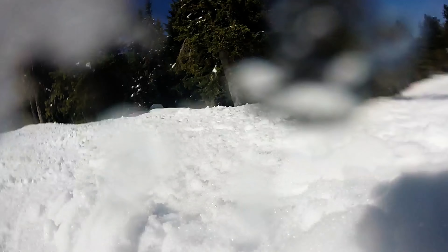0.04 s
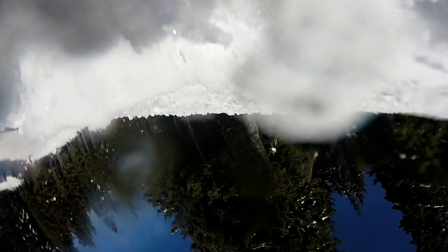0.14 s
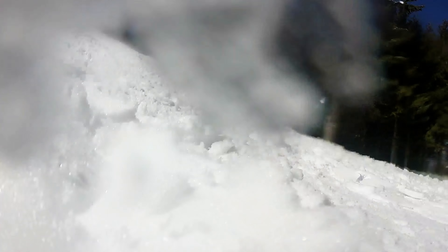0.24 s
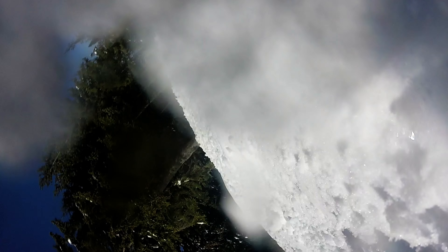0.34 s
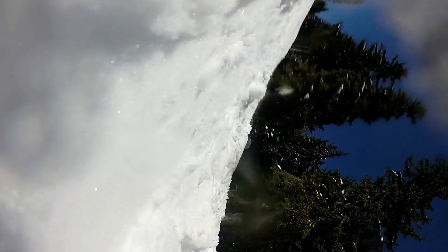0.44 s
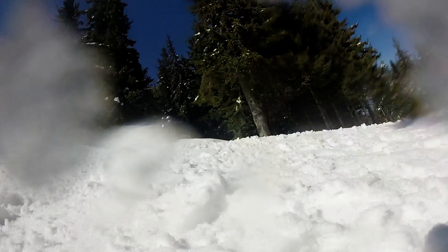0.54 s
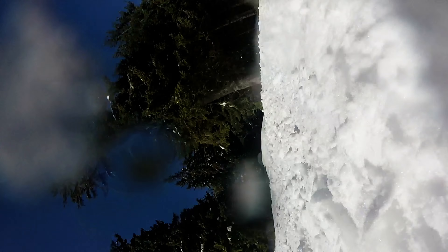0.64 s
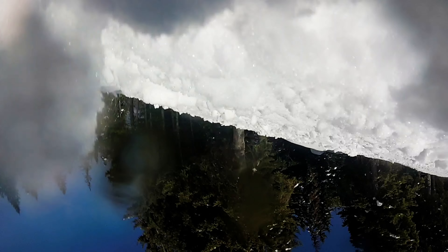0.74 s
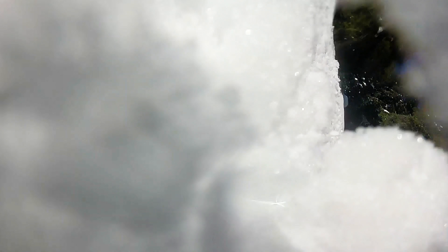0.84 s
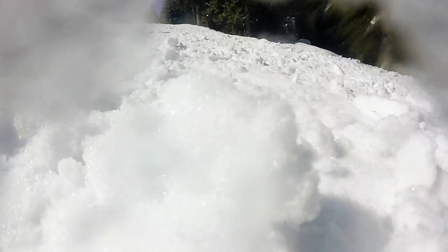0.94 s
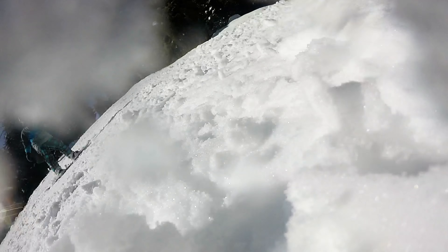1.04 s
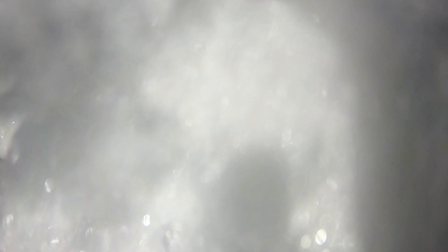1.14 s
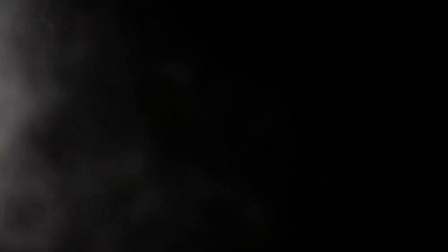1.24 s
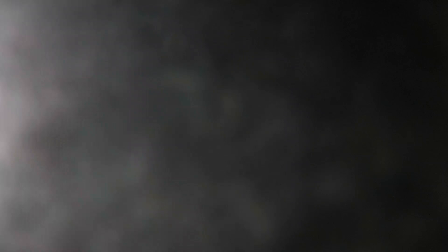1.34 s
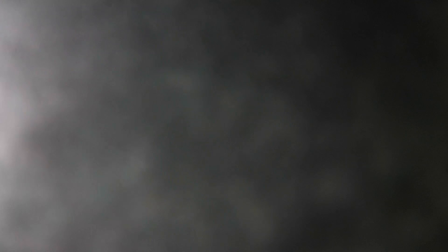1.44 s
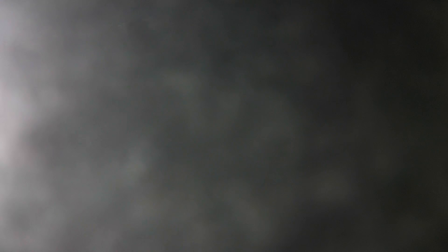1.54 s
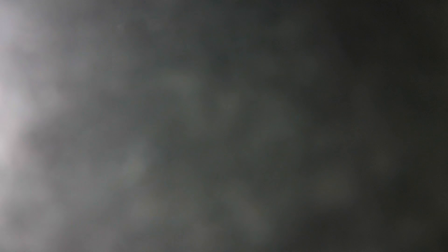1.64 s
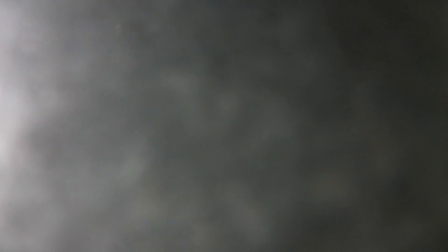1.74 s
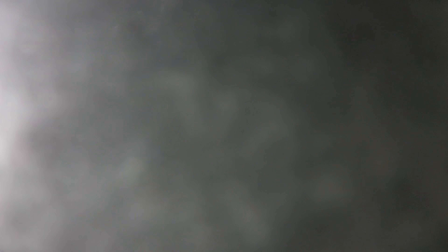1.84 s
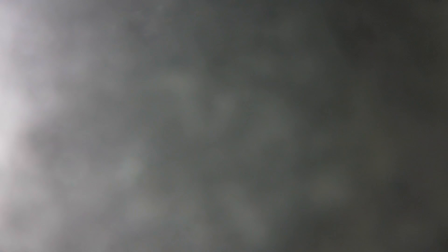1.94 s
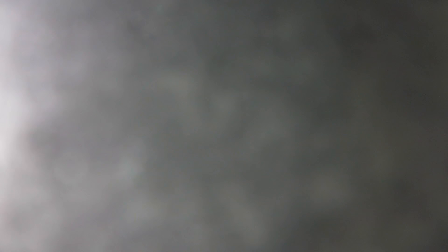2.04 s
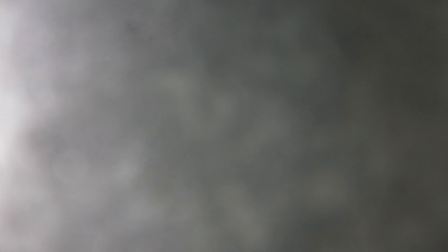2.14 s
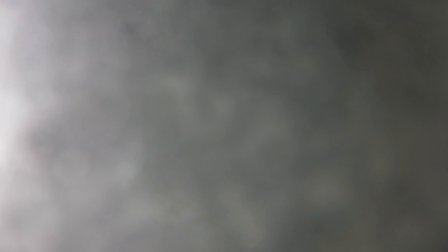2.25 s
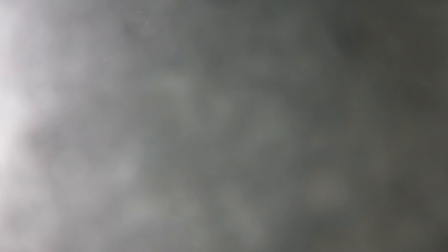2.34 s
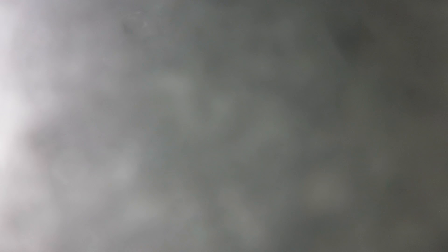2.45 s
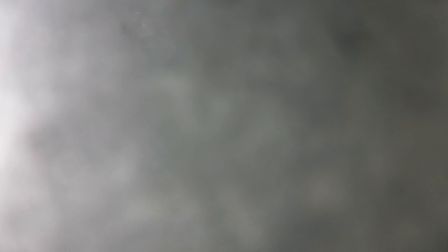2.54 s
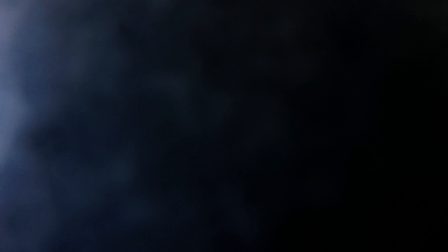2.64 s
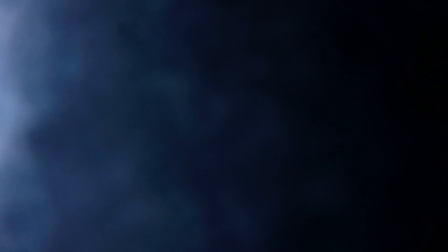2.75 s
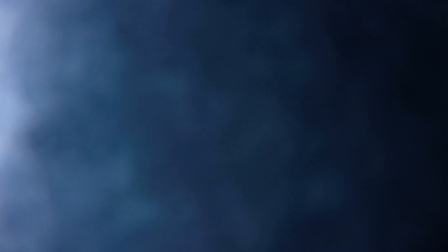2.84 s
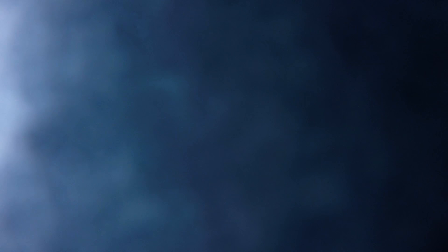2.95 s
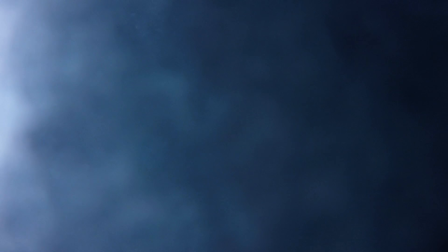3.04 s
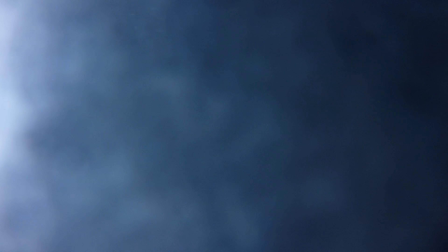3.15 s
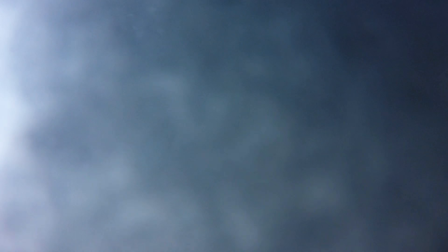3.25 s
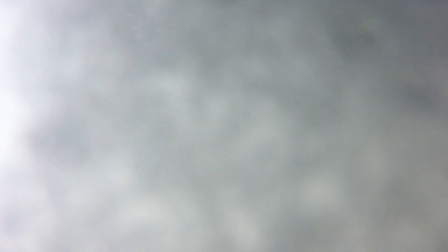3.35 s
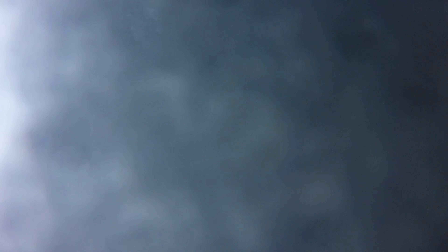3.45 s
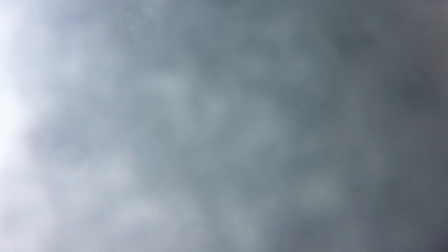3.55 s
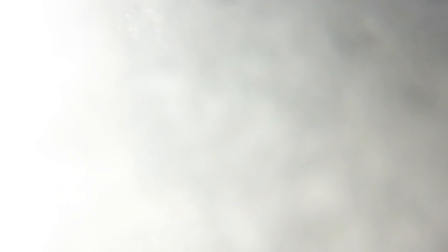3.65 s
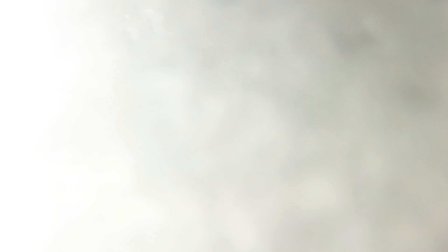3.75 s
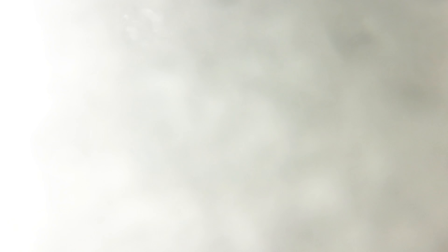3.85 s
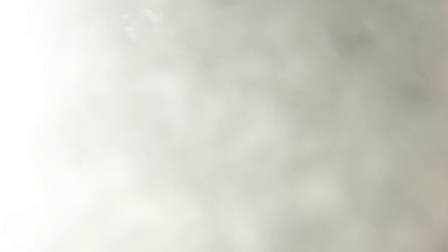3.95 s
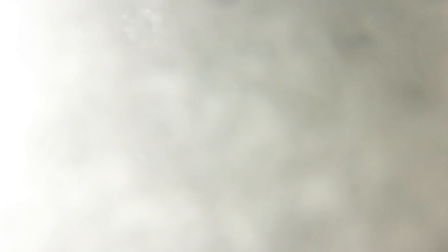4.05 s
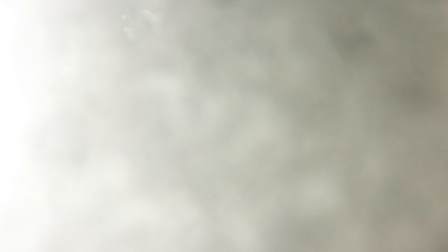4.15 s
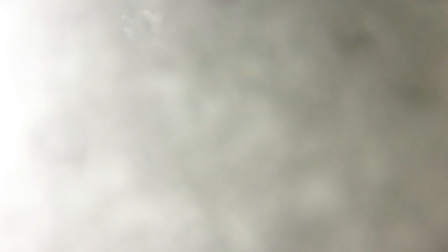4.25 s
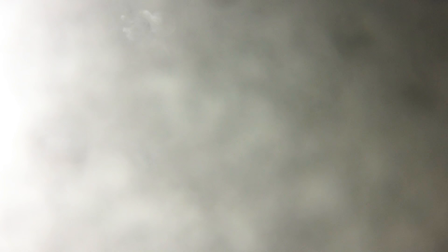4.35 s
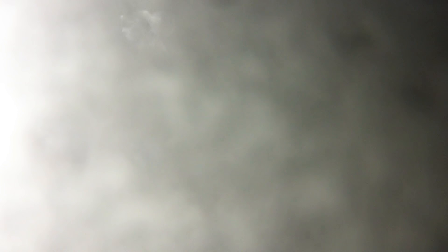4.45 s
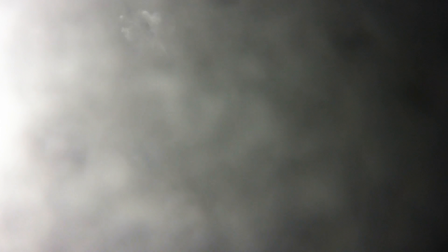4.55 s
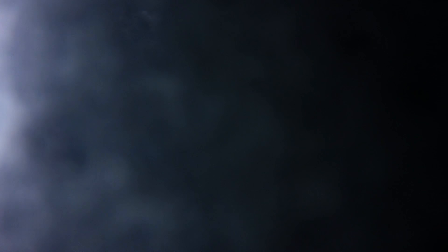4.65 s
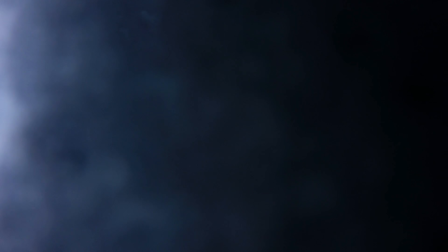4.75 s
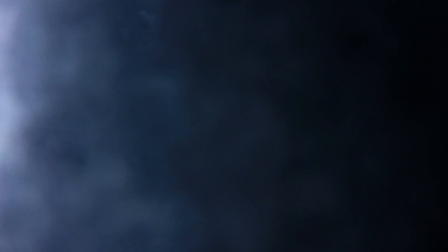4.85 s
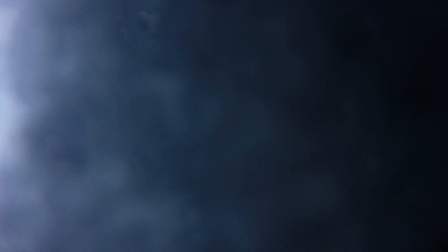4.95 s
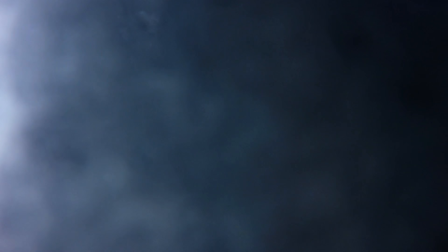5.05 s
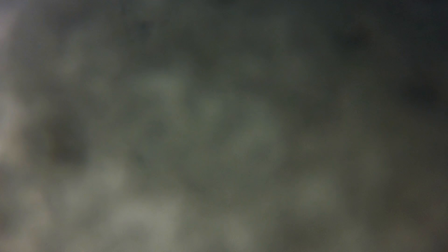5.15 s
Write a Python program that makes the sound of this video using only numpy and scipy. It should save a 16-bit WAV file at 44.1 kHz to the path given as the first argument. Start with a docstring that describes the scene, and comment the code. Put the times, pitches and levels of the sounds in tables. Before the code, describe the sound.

Snow crunches and cracks right against the microphone as a small camera bounces rapidly down a slope, its case knocking on hard crust with puffs of low rumble. The clatter ends abruptly. After a short lull, much quieter muffled scraping swells and fades twice as the camera slides in packed snow, ending in a cluster of damped bumps. Everything is very close and dry, outdoors, over a faint hiss.

```python
"""A camera tumbling in snow

A small camera tumbles down a slope. Each touch fractures snow grains, which excite the resonances of
its case and microphone port; landings force air into the port, and the hardest blows overload the
microphone. It ends face down, the port packed with snow, where the friction noise of soft scraping
swells twice and the case settles with a few damped knocks."""
import sys
import numpy as np
from scipy import signal
from scipy.fft import rfft, irfft, next_fast_len
from scipy.io import wavfile
from scipy.ndimage import map_coordinates

SR = 44100
rng = np.random.default_rng(int(sys.argv[2]) if len(sys.argv) > 2 else 0)


def to_wav(sig):
    """Store sig (one row per channel, or 1-D mono) as 16-bit WAV at the path in sys.argv[1].

    Samples outside -1..1 are clipped; the rate is SR.
    """
    pcm = np.clip(np.atleast_2d(sig), -1, 1) * 32767
    pcm = np.round(pcm).astype(np.int16)
    wavfile.write(sys.argv[1], SR, pcm.T)  # frames by channels


N = 229320

# Contacts with the snow; the powder level is high in loose snow, low in packed:
# (time [s], hold [s], level [dB], swell over the hold [dB], relative powder level [dB])
TOUCHES = [(0.0439, 0.003, -8.5, 3.5, -15.5), (.096, 0.014, -47, 3, 1), (.112, 0.0074, -16.5, 3, -23),
           (.146, 0.0076, -16.5, -3.5, -33.5), (0.2057, 0.019, -22, 2, -12.5),
           (0.2439, 0.0062, -20.5, -2, 0), (0.255, 0.022, -27, -12, -16), (.284, 0.019, -40.5, 11, -2.5),
           (.309, .033, -20.5, 0, -14), (.356, 0.029, -22, -3, -26.5), (0.409, 0.0034, -38.5, 2, -30),
           (.429, 0.036, -17.5, 1.5, -13), (.471, 0.01, -18, -7, -6), (.484, 0.021, -28, -8.5, -13),
           (0.512, .014, -32.5, 4, -22.5), (0.547, 0.041, -36, 12.5, -4), (0.579, 0.014, -17.5, 2, -17.5),
           (0.5945, 0.0037, -3, -2.5, -24), (.621, 0.023, -26.5, -3, -26), (.718, 0.013, -37, 16, -10),
           (0.73, 0.017, -17.5, -3, -9), (.758, 0.061, -23, -5.5, -16), (.797, 0.015, -15, -5.5, -26),
           (.813, 0.01, -17, 10, -10.5), (0.839, 0.019, -25, 0, -8), (0.866, 0.065, -29.5, 7.5, -13),
           (0.939, 0.049, -22.5, 9.5, -17), (.996, 0.13, -34, -11, -29.5),
           (1.104, 0.045, -20.5, 2.5, -24.5), (1.149, 0.017, -13, 1, -33), (1.17, 0.016, -22, -3, -24),
           (1.191, 0.022, -19, -1.5, -14), (1.212, 0.013, -15, -0.5, -16.5), (1.231, .034, -17.5, 3, -17.5),
           (1.27, 0.076, -25.5, -6.5, -17.5)]
# Impacts of the bare case on hard crust: (time [s], crack peak [dB], knock peak [dB])
BLOWS = [(0.0463, 3, -7.5), (0.115, -22, -20), (0.1467, -22, -27), (0.1512, -27, -27), (0.4796, -26, -7),
         (0.595, -5, -4), (0.6217, -15, -39), (0.776, -30, -45), (0.7989, -5.5, -23), (0.914, -14.5, -47),
         (0.9432, -10.5, -51), (1.0741, -20, -40), (1.1925, -16, -23), (1.226, -12.5, -11.5),
         (1.316, -12.5, -17)]
# Pressure pulses entering the port: (time [s], level before leakage [dB], Gaussian half width [s])
AIR_PULSES = [(0.0474, 5.5, 0.00035), (0.12, -7, 0.0016), (0.249, -13.5, 0.00085), (0.336, -20, .0015),
              (0.357, -20, 0.0012), (0.4791, -10, 0.001), (.597, -13, 0.0035), (0.749, -17.5, 0.0043),
              (0.8272, -13.5, .0015), (0.921, -20, 0.0024), (1.218, -15.5, .0014), (1.231, -20, 0.0038),
              (1.357, -20, 0.0039)]
# Settling impacts: (time [s], level [dB], hardness as spectral tilt [dB/decade], thud frequency [Hz])
KNOCKS = [(3.5622, -27.5, 3, 342), (3.569, -31, 6, 444), (3.683, -25, -1.5, 386), (3.689, -33, -6, 302),
          (4.4931, -15, -10.5, 265), (4.497, -21, -3.5, 312), (4.542, -23, -3, 258),
          (4.585, -22.5, -8, 275), (4.615, -32.5, 0, 320), (4.637, -31, -12, 317), (4.659, -34, 4, 337)]
# Fractures of single ice crystals: (time [s], peak [dB], relative sparkle level [dB])
TICKS = [(1.7788, -46, -22), (3.2864, -47, -16), (3.5173, -34, -31), (3.615, -45, -9), (4.2464, -34.5, -12),
         (4.4674, -44.5, -10), (4.573, -45, -12), (4.5944, -45, -14), (4.8346, -42.5, -11.5),
         (4.8521, -43, -13), (5.1542, -48, -1)]

# Resonances: (frequency [Hz], bandwidth [Hz], relative gain [dB])
SHELL_RESONANCES = [(1600, 310, 1.5), (1970, 220, -5), (2376, 500, -1), (2734, 78, 0.5)]  # ring of the bare case
HOUSING_RESONANCES = [(716, 22, 3), (474, 14, -8), (2250, 7.4, -18.5)]  # its faint after-ring
# Modes of free vibration: (frequency [Hz], relative level [dB], T60 [s])
BARE_MODES = [(328, -9.5, 0.023), (490, -8.5, 0.0035), (620, -1, 0.02), (776, 3, 0.0065), (950, 4, 0.012),
              (661, -26, 0.075)]  # knock of the bare case
PACKED_MODES = [(554, -18, 0.013), (773, -21, 0.0069), (1606, -13.5, 0.019), (2446, -3.5, 0.012),
                (2700, -9.5, .014)]  # upper modes of the case packed in snow

# Friction on the buried case: (time [s], hollow rub level [dB], hiss level [dB])
SCRAPES = [
    [(1.45, -80.5, -84), (1.626, -80.5, -87), (2.004, -59, -64), (2.37, -42.5, -58.5), (2.452, -40, -51),
     (2.652, -41, -48.5), (2.724, -46.5, -52.5), (2.862, -45.5, -50), (2.896, -47.5, -54),
     (2.918, -52.5, -53.5), (3.24, -62.5, -67.5), (3.44, -64.5, -66)],
    [(3.46, -65, -64), (3.576, -53.5, -58), (3.676, -55, -57), (3.684, -48, -58), (3.724, -52.5, -61),
     (3.946, -44, -56), (4.178, -46.5, -58.5), (4.312, -44.5, -45), (4.352, -41, -42), (4.378, -42, -48),
     (4.392, -60, -68), (4.42, -58.5, -63.5)],
]  # one table for each of two long scrapes
SETTLING = [(4.61, -59, -66.5), (4.672, -54, -64), (4.684, -68, -77), (5.15, -77, -81)]  # the last of the rubbing
# Envelope of the low rasp: (time [s], level [dB])
RASP_LEVEL = [(1.45, -82.5), (1.92, -66), (1.98, -54), (2.36, -54.5), (2.46, -44.5), (2.75, -57.5),
              (3.52, -68.5), (3.53, -63.5), (4.37, -57), (4.41, -73), (4.51, -63), (5.05, -80.5)]
# Spectral peak of the hiss, which dips as each scrape swells, then partly climbs back:
# (time [s], frequency [Hz])
SWISH_CENTRE = [(1.5, 4500), (2.2, 5180), (2.45, 3894), (2.65, 4127), (2.85, 4535), (3.2, 4420),
                (3.55, 5326), (3.8, 3390), (4.05, 3280), (4.22, 4580), (4.38, 4620)]

# Noise spectra: (frequency [Hz], relative spectral density [dB])
CRUSH_SPECTRUM = [(30, -28.5), (150, -16.5), (400, -5), (800, -6), (1150, -2), (1500, -3.5), (2600, -2.5),
                  (3100, -9), (3800, -34.5), (6000, -74)]  # snow crushed against the case
GRIT_SPECTRUM = [(2000, -44.5), (3000, 2.5), (3650, 2), (4150, 2), (4700, 2.5), (5400, -1), (5900, 1.5),
                 (6600, -3), (7300, -20.5), (8500, -47.5)]  # coarse grains
POWDER_SPECTRUM = [(5500, -50.5), (7300, 4), (8300, -3.5), (9900, -1.5), (10800, -8), (12500, -6),
                   (15000, -13), (16000, -20)]  # fine powder
RUB_SPECTRUM = [(1500, -43.5), (1900, -12), (2150, -4), (2400, 0), (2620, 2), (2830, -4.5), (3080, -12.5),
                (3700, -50.5)]  # hollow resonance under packed snow
RASP_SPECTRUM = [(500, -24), (850, -8.5), (1300, -6), (1600, 2), (1750, -2.5), (1950, -5.5), (2400, -37)]  # low rasp of a scrape
BODY_SPECTRUM = [(50, -19.5), (130, -5), (220, -4), (320, 1.5), (450, -2), (650, -5.5), (850, -11.5),
                 (1300, -36)]  # bass beneath the rasp
HISS_SPECTRUM = [(2600, -44.5), (3200, 0.5), (3600, -0.5), (4400, -2.5), (5200, -3.5), (5700, -4),
                 (6400, -5), (7200, -22), (9000, -64)]  # grains rubbing past
FINE_SPECTRUM = [(5000, -46), (6300, 5.5), (7000, 0), (7600, -4), (8200, -9), (10000, -16.5), (13000, -32),
                 (16000, -53)]  # finest, highest hiss
SCUFF_SPECTRUM = [(60, -4), (140, -2), (450, 0), (800, -5), (1100, -25), (2500, -6), (5000, -36)]  # short scuff on packed snow
TICK_SPECTRUM = [(2400, -36.5), (3400, 3.5), (4300, 5), (5500, 1.5), (7000, -15), (9000, -23)]  # a snapping crystal
RUMBLE_SPECTRUM = [(15, -7.5), (35, -0.5), (90, -2.5), (180, -4.5), (300, -12), (700, -34), (2000, -72.5)]  # air and loose snow on the case
FLOOR_SPECTRUM = [(100, -0.5), (3000, 0), (7000, -1.5), (10000, -4), (11500, -6.5), (13500, -11),
                  (15500, -22.5)]  # even background hiss


def crunches(port_hz=2170, port_hz_per_db=21.5, port_width_hz=750, shell_db=5, lead_s=0.03):
    """Brittle fracture: each touch breaks a burst of grains, which excite the shell and the port."""
    out = np.zeros(N)
    t = np.arange(SR // 5) / SR - lead_s
    shell = lambda hz: 1 + amp(shell_db) * modal_response(hz, SHELL_RESONANCES)
    for s, hold, db, swell_db, powder_db in TOUCHES:
        loose_db = powder_db + 16  # looser snow rings the port higher and is grittier
        port = lambda hz: 0.38 + resonance(hz, port_hz + port_hz_per_db * loose_db, port_width_hz)
        snaps = grains(len(t), rate=2000, spread_db=2.0, bed=0.54)
        crush = coloured(filtered(snaps, lambda hz: shell(hz) * port(hz)), CRUSH_SPECTRUM)
        # each snap spreads through the crust
        scatter = rng.standard_normal(len(t)) * amp(-60 * (t - t[0]) / 0.0045)
        spray = unit(signal.fftconvolve(snaps, scatter)[:len(t)]) + 0.39 * rng.standard_normal(len(t))
        lumps = amp(1.4 * wobble(110)[:len(t)])  # packed lumps break one by one
        grit = amp(-5 + 0.51 * loose_db) * coloured(spray, GRIT_SPECTRUM)
        powder = amp(powder_db) * coloured(spray, POWDER_SPECTRUM)
        add(out, s + t[0], touch_envelope(t, hold, db, swell_db) * (lumps * crush + grit + powder))
    return out * amp(1.08 * wobble(300))  # the snow gives way in small slips


def touch_envelope(t, hold, db, swell_db, attack_s=0.0019, lead_t60=0.03, trickle_t60=0.1):
    """Contact pressure rises as snow yields and decays at lift-off; loose grains lead and trail it."""
    early, late = np.maximum(-t, 0), np.maximum(t - hold, 0)
    pressure = amp(db + swell_db * (np.clip(t / hold, 0, 1) - .5))
    release_t60 = 0.039 / (1 + amp(db + 11.5) ** 2)  # above -11.5 dB the case bounces straight off
    contact = amp(-20 * early / attack_s - 60 * late / release_t60)
    trickle = amp(-29 - 60 * early / lead_t60 - 60 * late / trickle_t60)
    return np.hypot(pressure * contact, pressure ** 0.6 * trickle)


def blows(crack_t60=0.0057, shell_db=8):
    """Impulsive excitation: a hard contact cracks the crust and sets the whole case vibrating."""
    out, t = np.zeros(N), np.arange(SR // 10) / SR
    shell = lambda hz: resonance(hz, 3500, 5000) + amp(shell_db) * modal_response(hz, SHELL_RESONANCES)
    for s, crack_db, knock_db in BLOWS:
        burst = rng.standard_normal(len(t)) * amp(-60 * t / crack_t60)
        crack = filtered(burst, lambda hz: shell(hz) / (1 + (hz / 7500) ** 6))
        knock = sum(damped_mode(t, hz, db + rng.normal(0, 2.4), t60) for hz, db, t60 in BARE_MODES)
        add(out, s, amp(crack_db) * crack / np.abs(crack).max())
        add(out, s, amp(knock_db) * knock / np.abs(knock).max())
    return out


def air_thumps(vent_hz=36):
    """Compression of air at the port: the pressure leaks away and swings back, a high-pass response."""
    out, t = np.zeros(N), np.arange(N) / SR
    for s, db, width in AIR_PULSES:
        out += amp(db) * np.exp(-.5 * np.minimum(((t - s) / width) ** 2, 100))
    return filtered(out, lambda hz: (1j * hz) ** 2 / (vent_hz ** 2 - hz ** 2 + 1.8j * hz * vent_hz))


def buffeting(full_pressure_db=-27.5, rest_db=-63.5):
    """Buffeting by air and loose snow makes a rumble that grows as a power of the contact pressure."""
    pressure, t = np.zeros(N), np.arange(SR // 5) / SR
    for s, hold, db, swell_db, _ in TOUCHES:
        add(pressure, s, touch_envelope(t, hold, db, swell_db))
    level = amp(full_pressure_db) * pressure ** 0.58 + amp(rest_db) * background_fade_in()
    return level * amp(3 * wobble(30)) * coloured(rng.standard_normal(N), RUMBLE_SPECTRUM)


def scraping(rest_db=-68.5, sift_db=-64.5, swish_db=5.5, swish_octaves=0.18):
    """Sliding friction: grains rub past; packed snow muffles them and leaves a hollow resonance."""
    levels_db = curves(np.vstack([*SCRAPES, SETTLING])) + curves(RASP_LEVEL)
    rub, hiss, rasp = (np.hypot(amp(db), amp(rest_db) * background_fade_in()) for db in levels_db)
    sift, = curves([(1.905, 0), (1.964, 1), (3.124, 1), (3.183, 0)])  # powder sifts over the port
    fine = np.hypot(amp(-18.5) * hiss, amp(sift_db) * sift)
    body = amp(-20) * rasp ** 0.67
    drag = amp(0.6 * wobble(35))  # the snow grips unevenly
    friction = lambda spectrum: coloured(grains(N, rate=4500, spread_db=3.0, bed=1.0), spectrum)
    hz, s, frames = signal.stft(friction(HISS_SPECTRUM), SR, nperseg=256)
    off_centre = np.log2((hz[:, None] + 1) / np.interp(s, *np.transpose(SWISH_CENTRE))) / swish_octaves
    moving_peak = amp(swish_db * np.exp(-.5 * off_centre ** 2))
    swish = unit(signal.istft(frames * moving_peak, SR, nperseg=256)[1][:N])
    hollow = rub * friction(RUB_SPECTRUM) + rasp * friction(RASP_SPECTRUM)
    hollow += body * friction(BODY_SPECTRUM)
    return drag * (hollow + hiss * swish + fine * friction(FINE_SPECTRUM))


def settling_knocks(attack_s=0.0012, thud_t60=0.019, scuff_t60=0.096):
    """Damped vibration: the case thuds onto snow; harder contacts scuff it and reach its upper modes."""
    out, t = np.zeros(N), np.arange(SR // 10) / SR
    for s, db, hardness, thud_hz in KNOCKS:
        ring = sum(damped_mode(t, hz, level + hardness * np.log10(hz / thud_hz) + rng.normal(0, 1), t60)
                   for hz, level, t60 in [(thud_hz, 0, thud_t60), *PACKED_MODES])
        scuff = coloured(rng.standard_normal(len(t)), SCUFF_SPECTRUM)
        scuff *= amp(hardness - 20.5 - 60 * t / scuff_t60)
        add(out, s, amp(db) * (ring + scuff) * (1 - np.exp(-t / attack_s)))
    return out


def crystal_ticks(attack_s=0.00065, t60=0.0037):
    """Acoustic emission: single crystals snap at the port, each radiating a brief, bright transient."""
    out, t = np.zeros(N), np.arange(SR // 50) / SR
    for s, db, sparkle_db in TICKS:
        burst = rng.standard_normal(len(t)) * amp(-60 * t / t60) * np.minimum(t / attack_s, 1)
        snap = coloured(burst, TICK_SPECTRUM)
        sparkle = amp(sparkle_db) * coloured(burst, POWDER_SPECTRUM)
        add(out, s, amp(db) * (snap + sparkle) / np.abs(snap).max())
    return out


def noise_floor():
    """Broadband random noise: a faint, even hiss comes up once the tumbling is over."""
    level_db, = curves([(1.4, -82), (2.0, -69.5), (5.2, -71)])
    return amp(level_db) * coloured(rng.standard_normal(N), FLOOR_SPECTRUM)


def background_fade_in(start_s=1.335, rise_s=0.79):
    """Square-root ramp: steady background rumble and hiss fade in once the loud tumbling stops."""
    return curves([(start_s, 0), (start_s + rise_s, 1)])[0] ** .5


def grains(n, rate, spread_db, bed):
    """Shot noise: uneven fractures, rate a second, on a Gaussian bed of ones too small to resolve."""
    impulses = (rng.random(n) < rate / SR) * rng.choice([-1, 1], n)
    sizes = amp(spread_db * np.minimum(rng.standard_normal(n), 2))
    return unit(impulses * sizes) + bed * rng.standard_normal(n)


def damped_mode(t, hz, db, t60):
    """Free vibration of one mode: an exponentially decaying sinusoid."""
    return amp(db - 60 * t / t60) * np.sin(2 * np.pi * hz * t)


def resonance(hz, centre, width):
    """Frequency response of a damped oscillator."""
    return 1j * hz * width / (centre ** 2 - hz ** 2 + 1j * hz * width)


def modal_response(hz, modes):
    """Superposition of resonances."""
    return sum(amp(db) * resonance(hz, centre, width) for centre, width, db in modes)


def filtered(x, response):
    """Linear filtering: the spectrum of x times a frequency response."""
    size = next_fast_len(len(x) + SR // 20)
    return irfft(rfft(x, size) * response(np.fft.rfftfreq(size, 1 / SR)), size)[:len(x)]


def coloured(x, spectrum):
    """Spectral shaping of x, at rms 1."""
    points_hz, db = np.transpose(spectrum)
    return unit(filtered(x, lambda hz: amp(np.interp(np.log(hz + 1), np.log(points_hz), db))))


def wobble(rate):
    """Smooth random modulation, rate knots a second."""
    return map_coordinates(rng.standard_normal(int(N * rate / SR) + 4), [np.arange(N) * rate / SR])


def curves(rows):
    """Linear interpolation of each column after the time, one value per sample."""
    s, *columns = np.transpose(rows)
    return [np.interp(np.arange(N) / SR, s, column) for column in columns]


def amp(db):
    """Amplitude ratio of a level in decibels."""
    return 10 ** (np.asarray(db) / 20)


def unit(x):
    """Normalisation to rms 1."""
    return x / np.sqrt(np.mean(x ** 2) + 1e-20)


def add(track, s, sound):
    """Superposes a sound on the track at s seconds."""
    part = track[max(round(s * SR), 0):][:len(sound)]
    part += sound[:len(part)]


def scene():
    """Free-field superposition: all sources reach one microphone directly; open snow gives no echo."""
    crunch = crunches()
    after_ring = filtered(crunch, lambda hz: modal_response(hz, HOUSING_RESONANCES))
    tumble = crunch + after_ring + blows() + air_thumps() + buffeting()
    return (tumble + scraping() + settling_knocks() + crystal_ticks() + noise_floor())[None]


def record(dry, cutoff_hz=15600):
    """Saturation and band limiting: the microphone overloads softly and loses the highest treble."""
    saturated = dry[0] / (1 + np.abs(dry[0]) ** 4) ** (1 / 4)
    return filtered(saturated, lambda hz: 1 / (1 + (hz / cutoff_hz) ** 120))[None]


dry = scene()
out = record(dry)
to_wav(out)
```